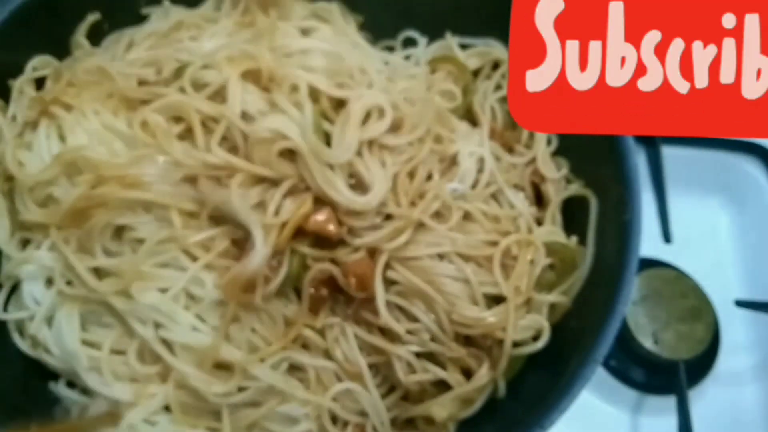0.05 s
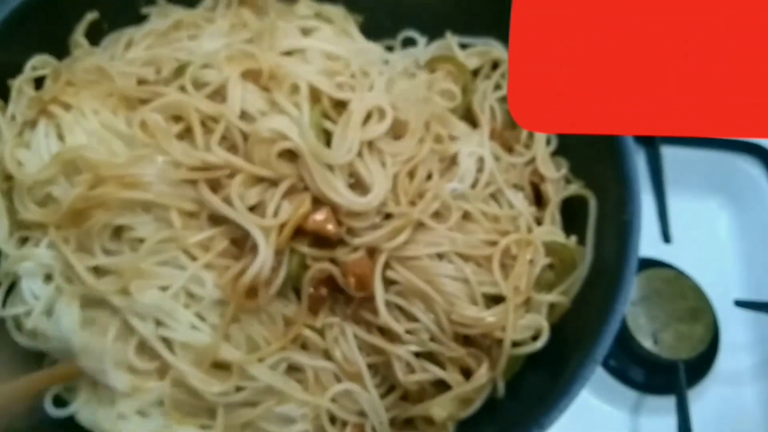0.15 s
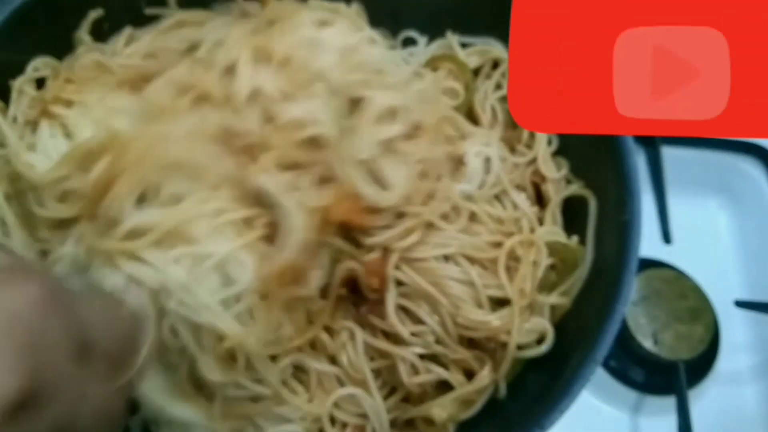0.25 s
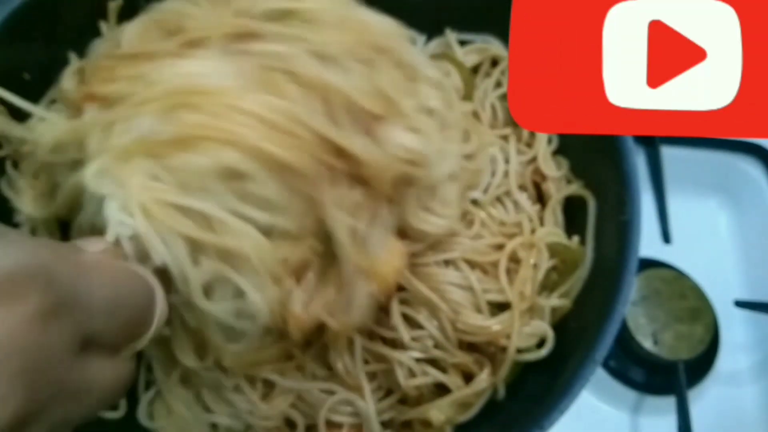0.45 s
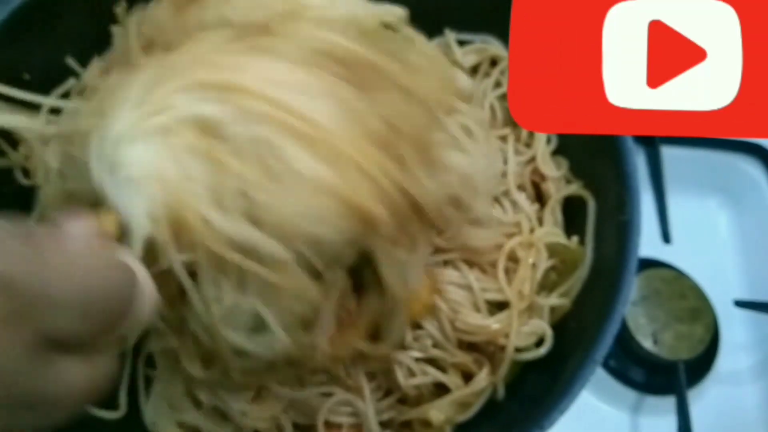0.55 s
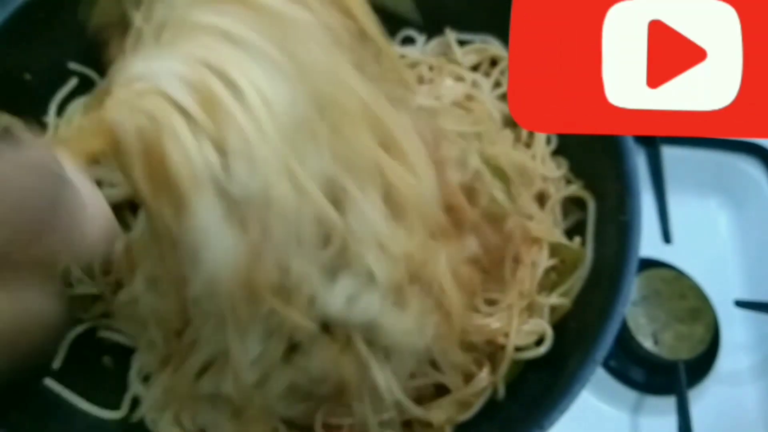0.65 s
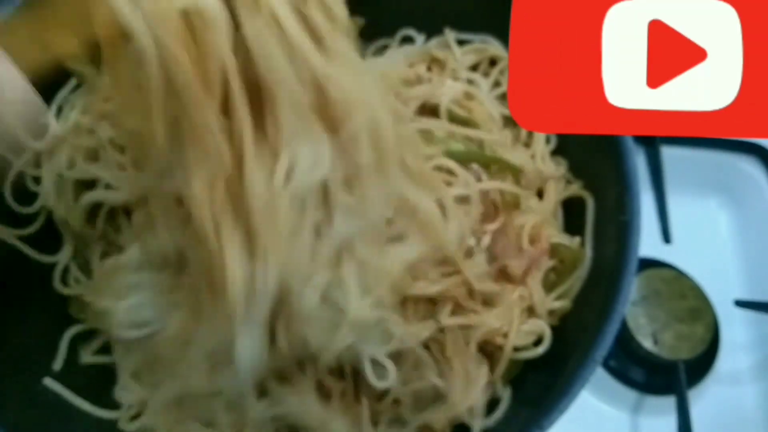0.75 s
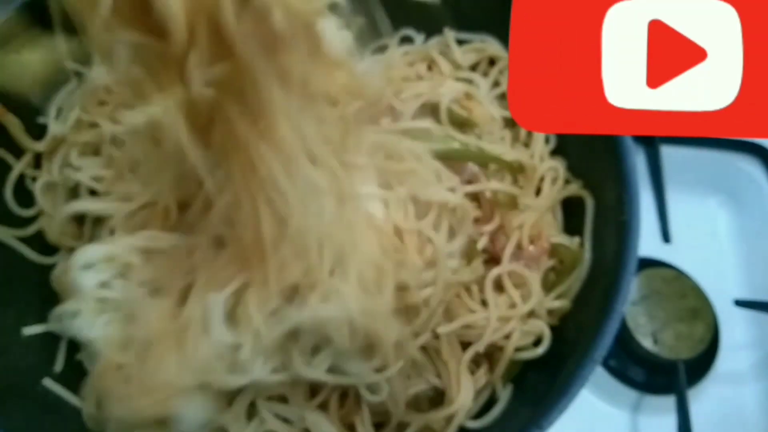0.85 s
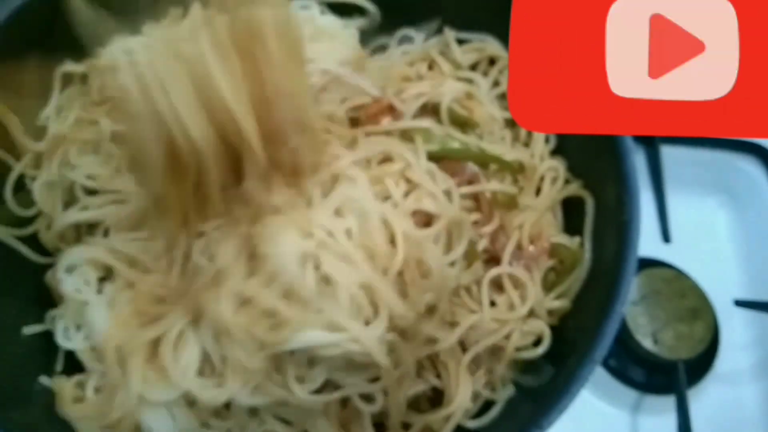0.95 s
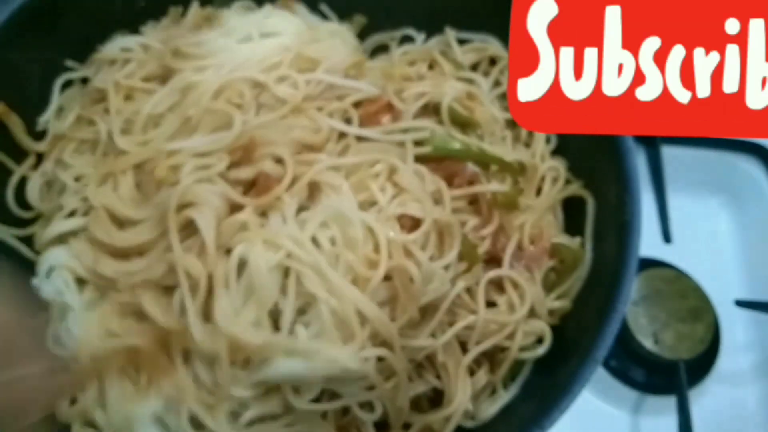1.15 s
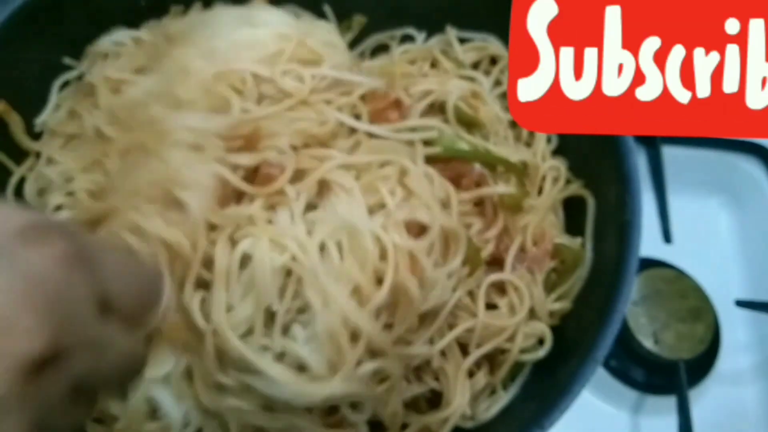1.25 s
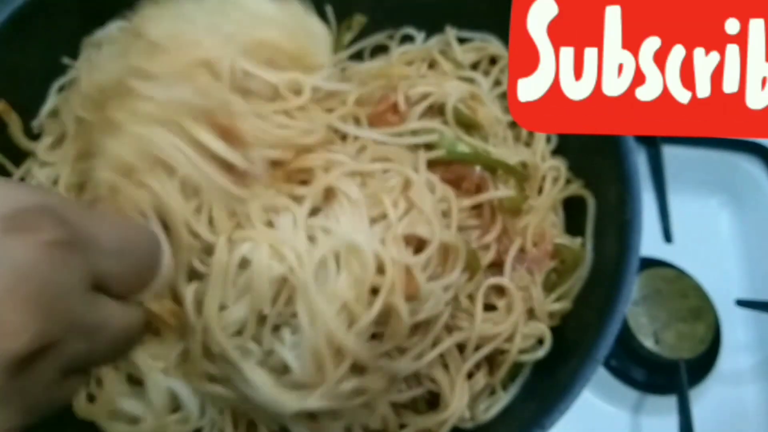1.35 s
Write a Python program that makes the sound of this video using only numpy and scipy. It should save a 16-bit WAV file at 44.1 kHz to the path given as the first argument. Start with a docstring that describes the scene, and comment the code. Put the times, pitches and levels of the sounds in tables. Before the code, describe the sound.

Wet noodles are tossed in a pan, heard close in a small kitchen. A utensil plunges in at 0.2 seconds and drags with sticky smacks while the pan rumbles softly on the stove. The loudest sound, a sharp scrape, comes at about 0.55 seconds. Small wet clicks follow, then a light metal tap at 1 second and a softer dig and stir from 1.25 seconds, over faint hiss.

```python
"""In a small kitchen, close to the stove, soft wet noodles are tossed in a pan.
A utensil plunges in, drags along the bottom, scrapes sharply as it lifts, and digs in again: each stroke
is a stream of stick-slip clicks that sets the pan ringing. Sticky strands part with little smacks, metal
taps and bounces once, the pan rumbles as it rocks on its support, and a faint hiss lies under it all."""
import sys
import numpy as np
from scipy import signal
from scipy.fft import rfft, irfft
from scipy.io import wavfile
from scipy.ndimage import uniform_filter1d

SR = 44100
rng = np.random.default_rng(int(sys.argv[2]) if len(sys.argv) > 2 else 0)


def master_out(mix):
    """Clip the mix to full scale and print it as 16-bit PCM to the path in sys.argv[1]."""
    frames = np.transpose(np.atleast_2d(mix))
    ceiling = np.clip(frames, -1, 1)
    pcm = np.round(ceiling * 32767).astype(np.int16)
    wavfile.write(sys.argv[1], SR, pcm)


N = 61739
T = np.arange(N) / SR


def utensil():
    """Seven strokes through the noodles, each with its own gesture; touch and plunge share a colour."""
    # gestures: (start [s], attack [s], hold [s], release [dB/s], relative level [dB], slips [1/s],
    # spread of slip sizes [dB])
    touch = (0.165, 0.03, 0.005, 300, -58, 1500, 3.0)
    plunge = (0.196, 0.028, 0.04, 310, -36.4, 5000, 3.0)
    drag = (0.272, 0.025, 0.046, 560, -44.6, 2000, 3.5)
    lift = (0.5385, 0.008, 0.03, 400, -28.4, 3000, 3.0)
    slide = (0.63, 0.02, 0.055, 480, -48, 700, 4.0)
    dig = (1.239, 0.012, 0.056, 520, -53, 1500, 2.5)
    stir = (1.335, 0.015, 0.02, 200, -58, 1500, 2.5)
    # friction spectra: (frequency [Hz], relative level [dB])
    plunge_colour = [(200, -20), (480, -15), (620, -10), (790, -11), (870, -19), (1040, -7), (1300, -8),
                     (1630, -16), (2020, -2), (2700, 0), (3160, -1), (3520, -12), (4350, -11), (4800, -5),
                     (5900, -6), (7100, -1), (7900, -8), (8900, -21), (11000, -23), (14500, -52)]
    drag_colour = [(250, -27), (530, -24), (760, -13), (890, -2), (1300, -4), (1440, -11), (1560, -6),
                   (1680, -14), (1920, 0), (2300, -2), (2640, -7), (2950, -6), (3150, -16), (3580, -23),
                   (4700, -11), (5900, -13), (7400, -10), (9000, -32), (10900, -24), (14000, -56)]
    lift_colour = [(240, -81), (400, -51), (550, -54), (723, -30), (1090, -44), (1330, -26), (1450, -34),
                   (1940, -10), (2790, 0), (4600, -9), (5270, -21), (6130, -25), (7810, -24), (9660, -59),
                   (10600, -43), (11900, -63), (15000, -64)]
    slide_colour = [(290, -77), (500, -47), (745, -18), (1110, -18), (1610, -35), (2050, -2), (3230, -2),
                    (4410, -5), (6300, -25), (6570, -22), (9380, -33), (10800, -27), (15000, -51)]
    dig_colour = [(120, -61), (200, -31), (269, -26), (542, -42), (648, -16), (1040, 1), (1170, -12),
                  (1300, -6), (1730, -23), (1950, -7), (2550, -12), (2740, -20), (2950, -10), (3280, -34),
                  (4830, -30), (5280, -44), (7000, -38), (9100, -68), (15400, -120)]
    stir_colour = [(290, -66), (500, -36), (710, -1), (1700, -26), (1870, -6), (2440, -2), (2650, -14),
                   (2920, -4), (3680, -14), (4520, -8), (9000, -38), (11700, -68), (19800, -120)]
    return (stroke(touch, plunge_colour) + stroke(plunge, plunge_colour) + stroke(drag, drag_colour)
            + stroke(lift, lift_colour) + stroke(slide, slide_colour)
            + stroke(dig, dig_colour) + stroke(stir, stir_colour))


def stroke(gesture, colour):
    """Stick and slip against the pan: a stream of clicks that swells, holds and dies with the force."""
    start, attack, hold, release, level_db, per_s, spread_db = gesture
    force = np.clip((T - start) / attack, 0, 1)
    force *= from_db(-release * np.maximum(T - start - attack - hold, 0))
    clicks = slips(per_s, spread_db)
    local_rms = np.sqrt(np.abs(uniform_filter1d(clicks ** 2, size=500)) + 1e-4)
    return from_db(level_db) * coloured(clicks / local_rms * force, colour)


def pan(friction):
    """The pan's modes ring along with whatever rubs it."""
    # pan resonances: (frequency [Hz], bandwidth [Hz], level against the plain stroke [dB])
    modes = [(1060, 50, -5), (1940, 60, 0), (2280, 70, -2), (2470, 50, -4), (2710, 60, -6), (2930, 60, -4),
             (3190, 50, -5), (4510, 70, -1), (4870, 70, 0), (6620, 120, -2), (7260, 120, -2),
             (7860, 130, 0)]
    out = friction.copy()
    for hz, width, level_db in modes:
        r = np.exp(-np.pi * width / SR)
        feedforward = (1 - r * r) / 2 * np.array([1, 0, -1])
        feedback = [1, -2 * r * np.cos(2 * np.pi * hz / SR), r * r]
        out += from_db(level_db) * signal.lfilter(feedforward, feedback, friction + 1e-18)
    return from_db(-2) * out


def smacks():
    """Each parting strand or light knock is a click and a brief ring at its own pitch."""
    # wet smacks and knocks: (time [s], peak level [dB], pitch [Hz], bandwidth [Hz])
    hits = [(0.015, -62, 1980, 130), (0.037, -53, 3000, 220), (0.174, -52, 6550, 150),
            (0.189, -46, 6500, 400), (0.191, -47, 3800, 450), (0.203, -41, 2200, 250),
            (0.213, -35, 2160, 250), (0.2295, -28, 2700, 2000), (0.232, -34, 600, 600),
            (0.233, -33, 1200, 700), (0.327, -31, 2400, 2000), (0.392, -38, 2200, 700),
            (0.42, -48, 2000, 200), (0.449, -49, 2000, 200), (0.484, -62, 10850, 400),
            (0.489, -53, 2250, 500), (0.508, -53, 2950, 150), (0.612, -60, 680, 50),
            (0.646, -41, 6900, 400), (0.696, -51, 1080, 200), (0.714, -37, 5000, 1500),
            (0.743, -52, 10800, 1200), (0.745, -42, 4300, 1200), (0.805, -49, 1950, 220),
            (0.807, -56, 1250, 220), (0.837, -43, 1920, 200), (0.839, -56, 800, 300),
            (0.896, -53, 1070, 200), (0.914, -57, 4220, 130), (0.947, -51, 2390, 300),
            (0.946, -55, 7000, 500), (0.995, -60, 5200, 160), (1.096, -61, 4420, 90),
            (1.208, -54, 2080, 400), (1.216, -59, 840, 150), (1.25, -61, 270, 50), (1.255, -47, 1280, 300),
            (1.264, -45, 1050, 250), (1.274, -49, 2950, 200), (1.295, -39, 1020, 150),
            (1.297, -43, 2450, 300), (1.303, -42, 2050, 300), (1.348, -45, 4050, 250),
            (1.351, -49, 3000, 300), (1.367, -49, 4500, 300)]
    splash_db = -32
    age = np.arange(int(0.08 * SR)) / SR
    out = np.zeros(N + len(age))
    for start, peak_db, hz, width in hits:
        damping = np.minimum(np.pi * width * age, 100)
        envelope = (damping * np.exp(1 - damping)) ** 2 + from_db(splash_db) * np.exp(-damping)
        first = int(start * SR)
        out[first:first + len(age)] += from_db(peak_db) * envelope * np.sin(2 * np.pi * hz * age)
    return out[:N]


def taps():
    """Metal grazes, lands and bounces; each contact strikes the same bright modes in a new balance."""
    # contacts: (time [s], level [dB])
    contacts = [(1.0325, -62), (1.0361, -47), (1.0392, -49.5), (1.0407, -47.5)]
    # metal resonances: (frequency [Hz], relative level [dB], t60 [s])
    modes = [(5100, -8, 0.045), (5800, -5, 0.02), (6350, -2, 0.008), (6750, 0, 0.012), (7350, -3, 0.012),
             (8080, -5, 0.015), (9550, -14, 0.02)]
    age = np.arange(int(0.08 * SR)) / SR
    out = np.zeros(N + len(age))
    for start, level_db in contacts:
        first = int(start * SR)
        scatter_db = rng.normal(0, 2, len(modes))
        for k, (hz, mode_db, t60) in enumerate(modes):
            ring = np.exp(-np.log(1000) * age / t60) * np.sin(2 * np.pi * hz * age)
            out[first:first + len(age)] += (-1) ** k * from_db(level_db + mode_db + scatter_db[k]) * ring
    return out[:N]


def rocking():
    """Low rumble of the pan shifting on the stove, and its note swelling under the drag."""
    # rumble envelope: (time [s], relative level [dB])
    envelope = [(0.0, -54), (0.088, -56), (0.12, -64), (0.248, -54), (0.268, -59), (0.294, -52),
                (0.334, -49), (0.61, -71), (0.68, -65), (0.7, -69), (0.942, -68), (0.95, -64), (1.008, -64),
                (1.124, -75), (1.172, -64), (1.326, -72), (1.362, -78), (1.4, -62)]
    # rumble spectrum: (frequency [Hz], relative level [dB])
    colour = [(22, -17), (38, -12), (52, 0), (72, -7), (104, 2), (150, -2), (172, -17), (240, -26),
              (400, -48)]
    note_hz, note_db, start_s, attack_s, fall_db_per_s = 148, -49, 0.275, 0.05, 85
    times, level_db = np.transpose(envelope)
    rumble = coloured(rng.standard_normal(N), colour)
    rumble /= np.sqrt(uniform_filter1d(rumble ** 2, size=2500))  # even out the noise's own swells
    rumble *= from_db(np.interp(T, times, level_db) - 1.5)
    age = np.maximum(T - start_s, 0)
    decay = from_db(note_db - fall_db_per_s * np.maximum(age - attack_s, 0))
    return rumble + np.minimum(age / attack_s, 1) * decay * np.sin(2 * np.pi * note_hz * age)


def crackle():
    """Wet strands give off a faint bed of tiny clicks."""
    # click spectrum: (frequency [Hz], relative level [dB])
    colour = [(1500, -20), (2400, 0), (3500, -8), (7000, -5), (9000, -18), (14000, -32)]
    clicks = coloured(slips(per_s=350, spread_db=3), colour)
    return from_db(-82) * unit_rms(clicks)


def kitchen_reverb(send):
    """Dense reflections build quickly and die away band by band."""
    # room decay: (frequency [Hz], t60 [s])
    bands = [(250, 0.16), (1000, 0.22), (2100, 0.35), (3300, 0.27), (6500, 0.25), (14000, 0.24)]
    size, build_s = 32768, 0.008
    white = rfft(rng.standard_normal(size))
    hz, age = np.arange(size // 2 + 1) * SR / size, T[:size]
    tail = np.zeros(size)
    for centre, t60 in bands:
        share = at_hz([(f, float(f == centre)) for f, _ in bands], hz)  # neighbouring bands crossfade
        tail += irfft(white * share) * np.exp(-np.log(1000) * age / t60)
    tail *= np.minimum(age / build_s, 1)
    return signal.fftconvolve(send, tail / np.sqrt(np.sum(tail ** 2)))[:N]


def hiss():
    """Steady kitchen hiss in the centre, with thin microphone hiss in opposite polarity on each side."""
    # hiss spectra: (frequency [Hz], relative level [dB])
    kitchen_colour = [(200, -2), (245, -7), (300, -3), (400, -13), (560, -14), (700, -5), (795, 6),
                      (920, -8), (1250, -11), (1600, -16), (2100, -10), (2700, -7), (3800, -18),
                      (5500, -17), (7200, -12), (9000, -23), (11500, -30), (15500, -37)]
    mic_colour = [(3000, -25), (5500, -14), (7000, 0), (11000, 0), (13000, -11), (15500, -16)]
    centre = from_db(-71) * coloured(rng.standard_normal(N), kitchen_colour)
    side = from_db(-83) * coloured(rng.standard_normal(N), mic_colour)
    return centre + side * np.array([[1], [-1]])


def slips(per_s, spread_db):
    """Random clicks of uneven size."""
    sizes = from_db(spread_db * np.minimum(rng.exponential(1, N), 4))
    return sizes * rng.choice([-1, 1], N) * (rng.random(N) < per_s / SR)


def coloured(x, points):
    """Causal filter with the given spectrum and unit power gain, rolling off beyond the table's ends."""
    size = 16384
    hz = np.maximum(np.arange(size // 2 + 1) * SR / size, 1)
    rolloff = (1 + (points[0][0] / 2 / hz) ** 2) * (1 + (hz / points[-1][0] / 2) ** 2)
    gain = unit_rms(from_db(at_hz(points, hz)) / rolloff)
    # minimum phase keeps the attacks sharp
    cepstrum = irfft(np.log(gain + 1e-7))
    cepstrum[1:size // 2] *= 2
    cepstrum[size // 2 + 1:] = 0
    impulse = irfft(np.exp(rfft(cepstrum)))[:size // 2]
    return signal.oaconvolve(x, impulse)[:N]


def at_hz(points, hz):
    """Read a table on a log-frequency axis."""
    f, value = np.transpose(points)
    return np.interp(np.log(np.maximum(hz, 1)), np.log(f), value)


def from_db(db):
    """Decibels to gain."""
    return 10 ** (np.asarray(db) / 20)


def unit_rms(x):
    """Scale to unit rms."""
    return x / np.sqrt(np.mean(x ** 2) + 1e-20)


def scene():
    """Strokes and small details sit in the centre and feed the room, over rumble and hiss."""
    strokes = pan(utensil())
    details = smacks() + taps() + crackle()
    room = kitchen_reverb(from_db(-1) * strokes + from_db(-3) * details)
    return strokes + details + room + hiss() + rocking()


def record(dry):
    """A steep low-pass takes off the very top."""
    cutoff_hz = 15650
    return signal.sosfilt(signal.ellip(10, .1, 80, cutoff_hz, fs=SR, output="sos"), dry)


dry = scene()
out = record(dry)
master_out(out)
```